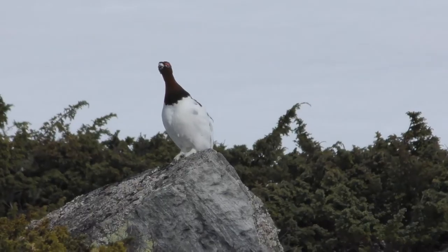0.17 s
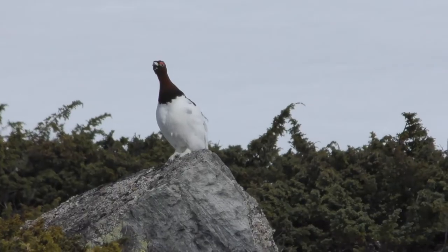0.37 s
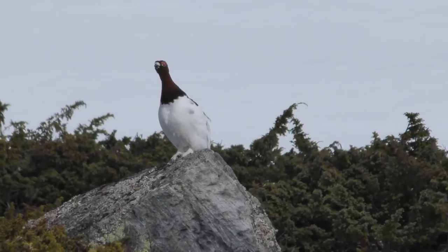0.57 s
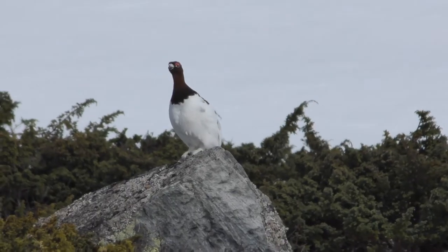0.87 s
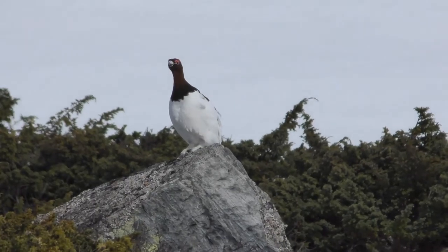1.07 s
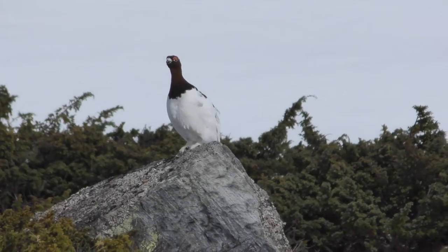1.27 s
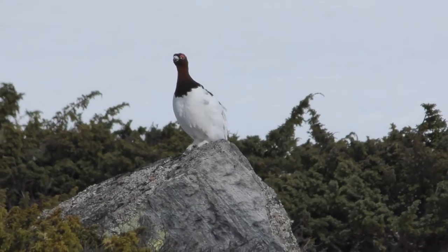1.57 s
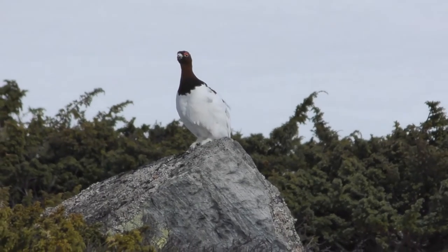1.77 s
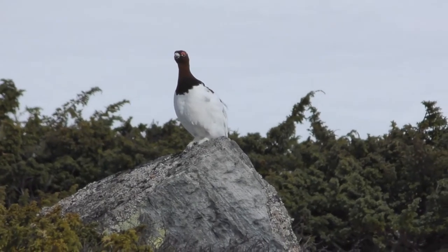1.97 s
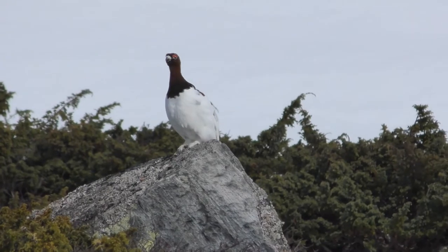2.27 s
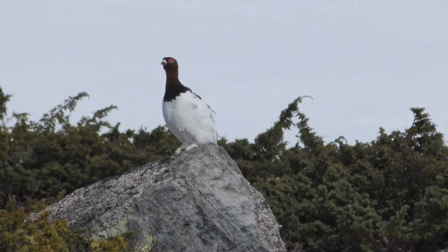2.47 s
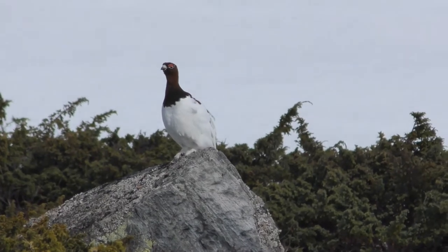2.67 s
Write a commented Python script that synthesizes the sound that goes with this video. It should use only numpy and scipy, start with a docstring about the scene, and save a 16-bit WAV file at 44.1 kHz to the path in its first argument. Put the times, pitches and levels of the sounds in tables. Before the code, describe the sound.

Outdoor stereo pickup on open moorland: a near-central grouse croaks in a quick, guttural, fading series with faint scatter from scrub, above a dull idling rumble and soft air; later one tiny high tick.

```python
"""Moorland: a grouse on a rock gives one rattling call of thirteen weakening croaks.
Each croak is a few slow raspy pulses that ring throat and beak; the rock echoes it, scrub scatters it.
Underneath, a low steady throb, probably a car idling: wavering sine lines over dull filtered noise.
Soft stereo noise makes the moorland air; one short high ring makes a tiny tick."""
import sys
import numpy as np
from scipy import signal
from scipy.fft import rfft, irfft
from scipy.io import wavfile
from scipy.ndimage import uniform_filter1d

SR = 44100
rng = np.random.default_rng(int(sys.argv[2]) if len(sys.argv) > 2 else 0)


def master(y):
    """Save y as 16-bit WAV."""
    cut = np.clip(np.atleast_2d(y).T, -1, 1)
    pcm = np.round(cut * 32767)  # scale
    wavfile.write(sys.argv[1], SR, pcm.astype(np.int16))


N = 123921  # samples
PULSE_SAMPLES = 700

# Engine lines: multiple of firing rate, level/dB rms before waver and pan
ENGINE_LINES = [(1, -48), (2, -41), (3, -44), (3.5, -52), (4, -52), (4.5, -51), (5, -44), (5.5, -48),
                (5.75, -48), (6.5, -48), (8, -46), (9, -46), (11, -53), (11.25, -53), (13.35, -55),
                (20, -66), (24, -68)]
# Engine phase between ears: f/Hz, left lead/rad
ENGINE_LEAD_RAD = [(140, -0.38), (320, -0.69)]
FIRING_HZ, SPEED_WAVER, SPEED_WAVER_HZ = 27.68, 0.0014, 2.41
LINE_WAVER_DB, LINE_WAVER_HZ, ENGINE_PAN_DB = 1.72, 4.37, -1

# Engine rumble spectrum: f/Hz, relative density/dB
RUMBLE_SPECTRUM = [(20, -7.5), (42, -32), (58, -5), (100, -6.5), (160, -1.5), (220, -3.5), (275, -6.5),
                   (355, -6), (430, -16.5), (600, -42.5), (1200, -55.5)]
RUMBLE_DB, RUMBLE_COHERENCE_SQ = -35.5, 0.96

# Air spectrum: f/Hz, relative density/dB
AIR_SPECTRUM = [(100, 3), (500, 4.5), (700, 2.5), (900, -1), (1350, 2), (1750, -4.5), (2500, -11),
                (3300, -10), (3700, -17), (4300, -17), (5500, -27), (7500, -32.5), (11000, -27),
                (15800, -29.5)]
# Air likeness between ears: f/Hz, squared coherence
AIR_COHERENCE_SQ = [(100, .6), (700, .4), (1400, .5), (2300, .25), (3200, .13), (5000, .28), (6200, .75),
                    (7500, .9), (11000, .6), (14000, .36)]
AIR_DB, AIR_FLICKER_DB, AIR_FLICKER_HZ = -45, 0.5, 7.41

# Balance of rumble and air: f/Hz, left minus right/dB
NOISE_BALANCE = [(60, 6), (110, -2), (200, -1.5), (380, -3.5), (700, -6.5), (1290, -5.5), (2380, -4.5),
                 (4400, -2), (8120, 0.0), (15000, 0.0)]

# Croaks: t/s, level/dB, pulse count, pulse spacing/ms, last gap/ms, first pulse/dB,
# throat tuning ratio, slackness 0-1, upper throat/dB, beak/dB
CROAK_TABLE = [(0.0376, -26.5, 9, 3.5, 7.2, -0.5, 0.99, 0.06, -4, 0),
               (0.1144, -26, 8, 3.66, 5.4, 0, 1.0, 0.37, -3.5, -1),
               (0.1819, -25, 7, 4.0, 4.5, -0.5, 0.99, 0.07, -3.5, -2.5),
               (0.2442, -26, 6, 4.1, 6, -0.5, 1.0, 0.15, -6.5, -14),
               (0.3060, -29, 5, 4.6, 6.2, 1.5, 1.01, 0.16, -6, -5),
               (0.3591, -29, 5, 5.2, 5.8, -1, 1.0, 0.36, -8, -6),
               (0.4148, -28, 4, 5.45, 5.2, -3, 0.99, 0.1, -6, -5),
               (0.4682, -30.2, 4, 5.4, 6.9, -6, 0.99, 0, -9, -10),
               (0.5224, -29.5, 3, 6.2, 6.5, -2.5, 0.98, 0, -13, -13),
               (0.5763, -30, 3, 6.4, 6.2, -3, 0.98, 0.1, -8, -6),
               (0.6333, -33, 3, 6.2, 7.3, 0, 0.97, 0, -7, -2),
               (0.6920, -33.5, 3, 7.4, 6.4, 0.5, 0.95, 0, -8, -1),
               (0.7617, -33, 3, 6.7, 7.2, -8, 0.97, 1, -6, -10)]
# Main throat resonance, sinks and splits as it slackens: f/Hz, tense/dB, slack/dB (both relative)
THROAT_SHAPE = [(496, -52, -64), (1220, -9, -8.5), (1620, -22, -9.5), (1846, -2, 3.5), (2037, 4.5, 10.5),
                (2224, 10.5, -8), (2320, 1.5, -0.5), (2582, 4, 3.5), (2780, -13.5, -20.5), (3570, -25, -25),
                (4800, -61, -50), (7000, -85, -75), (16000, -88, -83)]
# Upper throat resonances: f/Hz, width/Hz, level/dB re throat before the croak's own offset
UPPER_THROAT = [(4230, 560, -20.5), (5980, 560, -17.5)]
# Open beak resonances: f/Hz, width/Hz, level/dB re throat before the croak's own offset
BEAK_OPEN = [(8500, 600, -31), (9650, 700, -21.5), (11150, 900, -22.5), (12200, 1000, -31),
             (14000, 3000, -31)]
# Beak still opening, first pulse only: f/Hz, width/Hz, level/dB as above
BEAK_FIRST = [(8620, 650, -22), (11000, 2500, -30)]
FIRST_GAP_MIN_MS, SLOWING_SHAPE = 4.95, 5.5  # higher shape: slowing comes later in the croak
HOLD, SLACKENING = 0.24, 2.2  # share of croak at full effort; slackness gain towards its end
FADE_DB, DULLING_DB = 11, 21  # falls approached at croak end: whole pulse, treble
FIRST_SLACK, FIRST_TREBLE_DB = 0.25, -5  # first pulse lower and duller
SAG = 0.04  # share by which upper resonances drop when fully slack
TIMING_JITTER, TUNING_JITTER, UPPER_JITTER, SIZE_JITTER_DB = 0.015, 0.016, 0.02, 0.7
RASP_DB, RASP_DECAY_S, HISS_DB, HISS_DECAY_S = -15, 0.0012, -28, 0.0022
BIRD_PAN_DB = -0.5

ROCK_DB, ROCK_DELAY_MS = -17, 2.3
SCRUB_BASS_DB, SCRUB_T60_S = -16, 0.17
SCRUB_TREBLE_LIFT_DB, SCRUB_CORNER_HZ = 6, 3780  # twigs scatter treble best

TICK_S, TICK_HZ, TICK_WIDTH_HZ, TICK_DB = 1.2088, 10000, 1800, -49
TOP_HZ, FADE_IN_S = 15900, 0.004


def undb(db):
    """Amplitude gain for a level in dB."""
    return 10 ** (np.asarray(db) / 20)


def level(x, db):
    """Scale to an rms level in dB."""
    return x * undb(db) / np.sqrt(np.mean(x ** 2))


def pan(db):
    """Left and right gains for a left-minus-right level in dB."""
    return undb(np.array([[.5], [-.5]]) * db)


def over_hz(points):
    """Interpolate (Hz, value) points over log frequency at every FFT bin."""
    hz, value = np.array(points, float).T
    bins_hz = np.arange(N // 2 + 1) * SR / N
    return np.interp(np.log(bins_hz + 1), np.log(hz), value)


def walk(rate_hz):
    """Slow random drift, spread near 1: held random steps smoothed twice."""
    hold = int(SR / rate_hz)
    steps = np.repeat(rng.standard_normal(N // hold + 1), hold)
    smooth = uniform_filter1d(uniform_filter1d(steps, hold), hold)
    return 1.33 * smooth[:N]


def add(out, start_s, sound):
    """Mix a sound into a track at its start time."""
    i = int(start_s * SR)
    out[i:i + len(sound)] += sound[:N - i]


def ring(hz, width_hz):
    """Pulse through a doubled resonance: quick swell and decay, envelope peak 1."""
    t = np.arange(PULSE_SAMPLES) / SR
    age = np.pi * width_hz * t
    return age * np.exp(1 - age) * np.sin(2 * np.pi * hz * t)


def stereo_noise(spectrum, coherence_sq, db):
    """Coloured noise: a shared part plus an opposed part, leaning right in the middle range."""
    mid, side = rfft(rng.standard_normal((2, N)))
    coherence = np.sqrt(np.clip(coherence_sq, 0, 1))
    ears = mid * np.sqrt(1 + coherence) + np.array([[1], [-1]]) * side * np.sqrt(1 - coherence)
    coloured = ears * undb(over_hz(spectrum)) * pan(over_hz(NOISE_BALANCE))
    return level(irfft(coloured, N), db)


def ear_lead(hz):
    """Engine phase shift in each ear, half the lead either way."""
    return np.array([[.5], [-.5]]) * np.interp(hz, *np.array(ENGINE_LEAD_RAD).T)


def idling():
    """Steady lines on the firing rate over a dull rumble, slightly out of step between ears."""
    cycles = np.cumsum(FIRING_HZ * (1 + SPEED_WAVER * walk(SPEED_WAVER_HZ))) / SR
    lines = np.zeros((2, N))
    for multiple, db in ENGINE_LINES:
        gain = np.sqrt(2) * undb(db + LINE_WAVER_DB * walk(LINE_WAVER_HZ))  # sqrt(2): rms to peak
        phase = 2 * np.pi * (multiple * cycles + rng.random())
        lines += gain * np.sin(phase + ear_lead(multiple * FIRING_HZ))
    rumble = rfft(stereo_noise(RUMBLE_SPECTRUM, RUMBLE_COHERENCE_SQ, RUMBLE_DB))
    bins_hz = np.arange(N // 2 + 1) * SR / N
    rumble = irfft(rumble * np.exp(1j * ear_lead(bins_hz)), N)
    return lines * pan(ENGINE_PAN_DB) + rumble


def air():
    """Soft rush over the moor: coloured stereo noise with a slight level flicker."""
    rush = stereo_noise(AIR_SPECTRUM, over_hz(AIR_COHERENCE_SQ), AIR_DB)
    return rush * undb(AIR_FLICKER_DB * walk(AIR_FLICKER_HZ))


def throat_knock(spectrum):
    """Minimum-phase pulse of the main throat resonance, from (Hz, dB) points, peak 1."""
    size = 2048
    hz, db = np.array(spectrum, float).T
    gain = undb(np.interp(np.arange(size // 2 + 1) * SR / size, hz, db))
    # Folding the cepstrum onto positive time gives minimum phase
    cepstrum = irfft(np.log(gain))
    cepstrum[1:size // 2] *= 2
    cepstrum[size // 2 + 1:] = 0
    pulse = irfft(np.exp(rfft(cepstrum)))[:PULSE_SAMPLES]
    return pulse / np.abs(pulse).max()


def throat_pulse(first, late, slack, tuning, upper_db, beak_db, waver, upper_waver):
    """One raspy push rings throat and beak; a puff of hiss escapes with it."""
    age_s = np.arange(PULSE_SAMPLES) / SR
    throat = [(hz * tuning * waver, tense_db + slack * (slack_db - tense_db))
              for hz, tense_db, slack_db in THROAT_SHAPE]
    bright_db = first * FIRST_TREBLE_DB - DULLING_DB * late ** 2
    upper = sum(undb(db + bright_db + upper_db) * ring(hz * (upper_waver - SAG * slack), width_hz)
                for hz, width_hz, db in UPPER_THROAT)
    beak = sum(undb(db + bright_db + beak_db) * ring(hz * waver, width_hz)
               for hz, width_hz, db in (BEAK_FIRST if first else BEAK_OPEN))
    rasp = undb(RASP_DB) * rng.standard_normal(PULSE_SAMPLES) * np.exp(-age_s / RASP_DECAY_S)
    push = (age_s == 0) + rasp
    treble = signal.fftconvolve(push, upper + beak)[:PULSE_SAMPLES]
    hiss = rng.standard_normal(PULSE_SAMPLES) * np.exp(-age_s / HISS_DECAY_S)
    treble += undb(HISS_DB + bright_db + beak_db) * hiss
    return throat_knock(throat) + treble


def grouse():
    """Pulse trains that hold, then fade, dull and slow as the throat slackens and its tones sink."""
    out = np.zeros(N)
    for (at_s, db, count, spacing_ms, last_gap_ms, first_db,
         tuning, slackness, upper_db, beak_db) in CROAK_TABLE:
        for k in range(count):
            late, first = k / count, k == 0
            spent = max(late - HOLD, 0) / (1 - HOLD)
            chance = rng.standard_normal(4)
            waver = 1 + TUNING_JITTER * chance[0]
            upper_waver = 1 + UPPER_JITTER * chance[3]
            slack = np.clip(slackness + first * FIRST_SLACK + SLACKENING * spent, 0, 1)
            pulse = throat_pulse(first, late, slack, tuning, upper_db, beak_db, waver, upper_waver)
            size_db = db + first * first_db - FADE_DB * spent + SIZE_JITTER_DB * chance[1]
            add(out, at_s, undb(size_db) * pulse)
            if first:
                gap_ms = max(spacing_ms, FIRST_GAP_MIN_MS)
            else:
                slowing = (k / max(count - 2, 1)) ** SLOWING_SHAPE
                gap_ms = spacing_ms + (last_gap_ms - spacing_ms) * slowing
            at_s += gap_ms * (1 + TIMING_JITTER * chance[2]) / 1000
    return out


def rock(x):
    """Weak close echo off the rock under the bird, filling the gaps between pulses."""
    lag = int(ROCK_DELAY_MS * SR / 1000)
    return undb(ROCK_DB) * np.pad(x, (lag, 0))[:N]


def scrub(x):
    """Bushes and rocks scatter a faint decaying noise tail, different in each ear."""
    t = np.arange(SR // 2) / SR
    tail = rng.standard_normal((2, len(t))) * np.exp(-np.log(1000) * t / SCRUB_T60_S)
    tail /= np.sqrt(np.sum(tail ** 2, axis=1, keepdims=True))  # unit energy per ear
    hz = np.arange(len(t) // 2 + 1) * SR / len(t)
    lift_db = SCRUB_TREBLE_LIFT_DB * hz ** 4 / (hz ** 4 + SCRUB_CORNER_HZ ** 4)
    tail = irfft(rfft(tail) * undb(lift_db), len(t))
    return undb(SCRUB_BASS_DB) * signal.fftconvolve(x[None], tail, axes=1)[:, :N]


def tick():
    """One tiny high tick: a single short resonance, equal in both ears."""
    out = np.zeros(N)
    add(out, TICK_S, undb(TICK_DB) * ring(TICK_HZ, TICK_WIDTH_HZ))
    return out


def scene():
    """Engine and air throughout; the call with its echo and scatter; the tick."""
    background = idling() + air()
    call = grouse()
    bird = (call + rock(call)) * pan(BIRD_PAN_DB) + scrub(call)
    return background + bird + tick()


def record(dry):
    """Short linear fade-in, then a steep elliptic low-pass."""
    opening = np.minimum(np.arange(N) / SR / FADE_IN_S, 1)
    low_pass = signal.ellip(10, .2, 80, TOP_HZ, fs=SR, output="sos")  # order, ripple/dB, stop/dB
    return signal.sosfilt(low_pass, dry * opening)


dry = scene()
out = record(dry)
master(out)
```